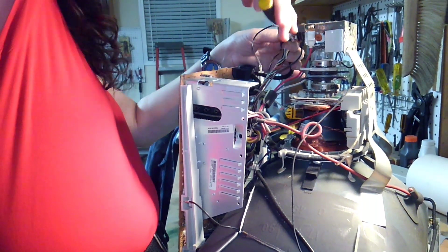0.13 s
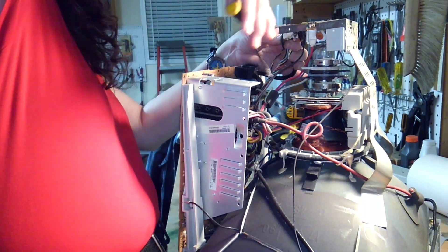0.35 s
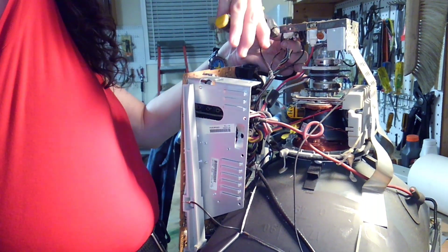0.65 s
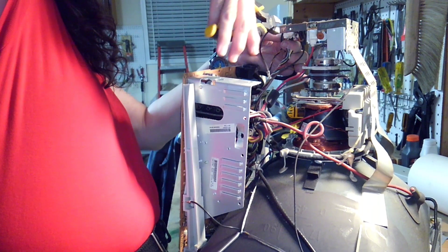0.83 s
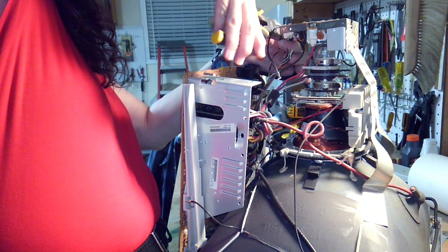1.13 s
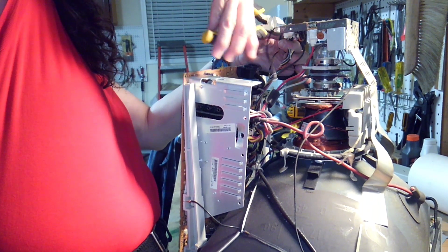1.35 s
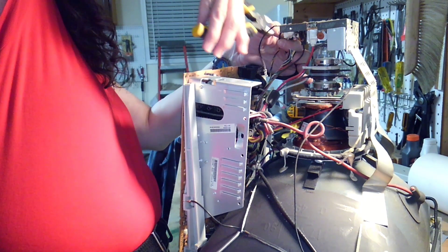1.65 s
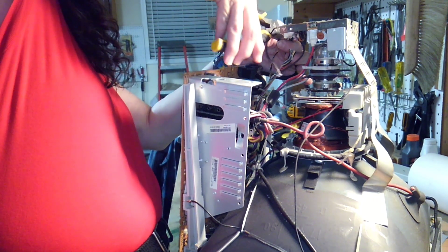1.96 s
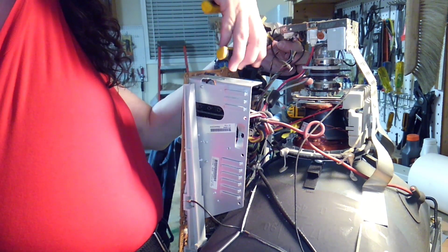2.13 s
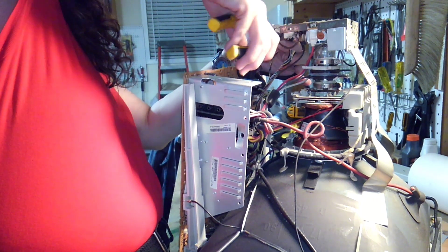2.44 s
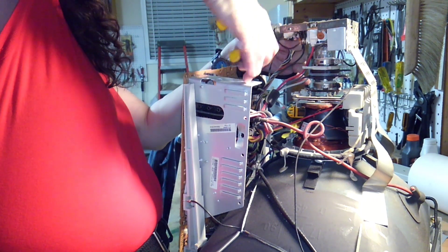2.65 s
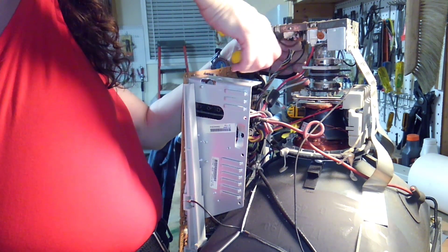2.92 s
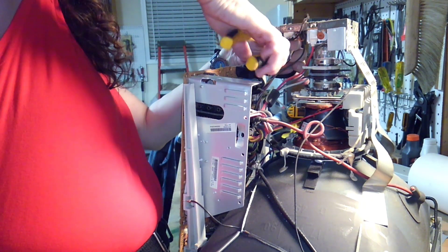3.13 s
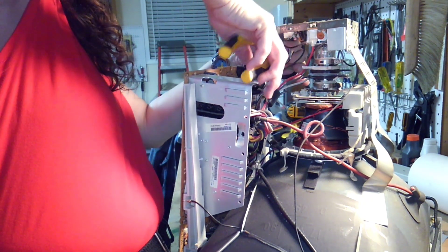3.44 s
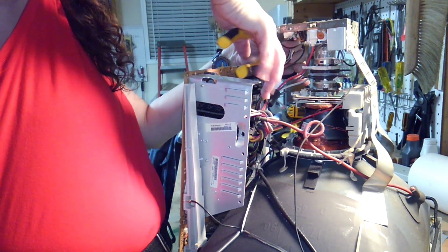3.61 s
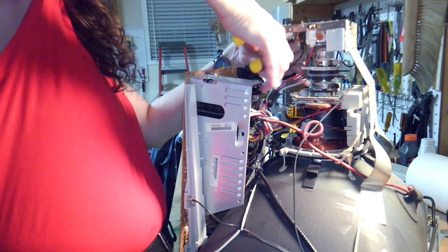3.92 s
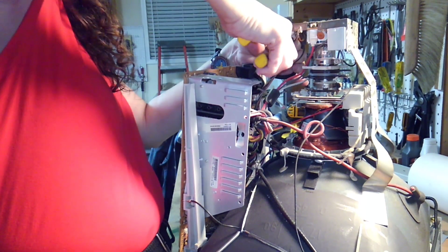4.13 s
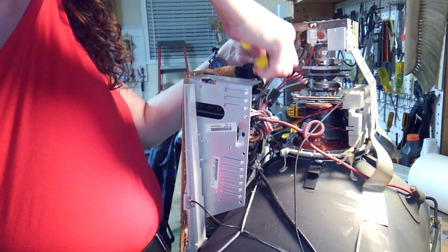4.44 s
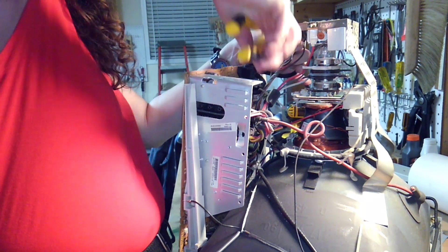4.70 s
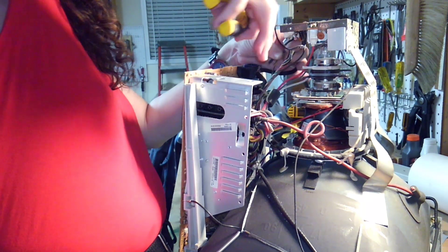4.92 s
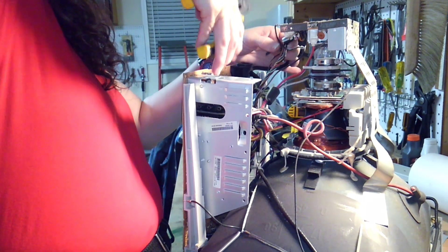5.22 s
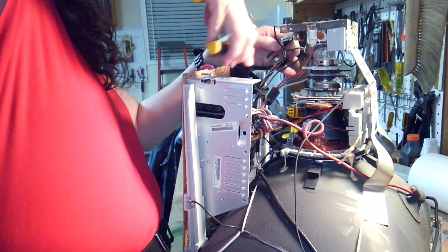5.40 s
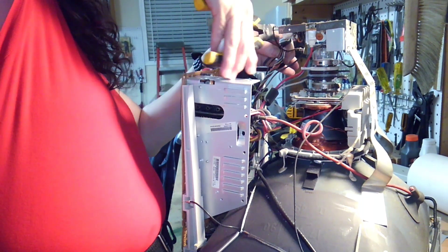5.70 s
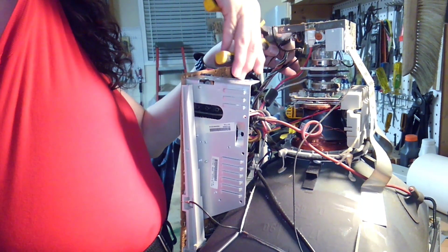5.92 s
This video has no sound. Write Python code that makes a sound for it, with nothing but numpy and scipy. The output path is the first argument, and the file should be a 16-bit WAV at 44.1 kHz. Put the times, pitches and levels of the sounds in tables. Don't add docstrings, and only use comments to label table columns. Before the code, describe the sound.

Sparse small clicks of hand cutters on thin metal and plastic, two hard crackling snips, faint scrapes and bench thumps in a workshop.

```python
import sys
import numpy as np
from scipy import signal
from scipy.fft import rfft, irfft
from scipy.io import wavfile

SR = 44100
rng = np.random.default_rng(int(sys.argv[2]) if len(sys.argv) > 2 else 0)


def persist_wave(psi):
    counts = np.round(np.clip(psi, -1, 1) * 32767).astype(np.int16)
    wavfile.write(sys.argv[1], SR, np.atleast_2d(counts).T)


def volts(x):
    e = np.asarray(x, float) / 20
    return 10 ** e


N = 267246

# start in seconds, jaws peak in dB,
# then shield, casing and wire crack in dB relative to the jaws.
SNIPS = [(1.5384, -15, -3, -18.5, -6), (1.5408, -12.5, -4, -26, -10.5), (1.5439, -9, -27, -30, -7),
         (1.548, -17, -3, -22, -5), (1.5519, -20, -13, -24, -15), (1.5962, -22, -14, -30, -20),
         (4.3268, -3.5, -7, -15, -13), (4.3338, -18.5, -18, -30, -23), (4.3404, -17, -17, -25, -20),
         (4.372, -14, -14, -17.5, -21), (4.3986, -9.5, -6.5, -15, -8), (4.4037, -10.5, -14, -26, -18),
         (4.4103, -15, -16, -8, -23), (4.5398, -27, -13, -3, -24), (4.5597, -29, -14, -22, -27)]
# start in seconds, jaws peak in dB,
# shield and casing in dB relative to the jaws, rattle length in ms.
TICKS = [(0.0573, -33, -6, -13, 15), (0.333, -37, -12, -10, 12), (0.3685, -41, 3, -16, 12),
         (0.398, -31.5, -2, -26, 7.2), (0.406, -34.5, 0, -15, 5.2), (0.88, -48, -2, -14, 3.9),
         (0.9257, -29.5, 2, -11, 6.1), (2.615, -38, -14, -15, 2.8), (2.6412, -29, -21, -15, 3.6),
         (2.699, -35.5, -9, -14, 9.1), (2.722, -36, -19, -11, 7.2), (2.736, -40, -14, -16, 5.6),
         (3.1724, -39.5, -7, -2, 6.9), (3.6816, -43.5, -4, -3, 9.7), (3.7698, -32, -12, -17, 5.4),
         (3.7865, -40, -20, 3, 4.8), (5.8916, -37, -11, -30, 10.5), (5.9958, -33, -11, -15, 10),
         (6.0011, -32, -5.5, -16.5, 16)]
# start in seconds, jaws peak in dB.
TOUCHES = [(0.035, -44), (0.079, -42), (0.7, -52), (0.9382, -50), (1.527, -45), (1.9831, -50),
           (2.6526, -47), (2.7574, -55), (3.1294, -47), (3.5783, -51), (3.8104, -51), (3.8494, -50),
           (3.929, -54), (5.3627, -47), (5.692, -51), (5.8185, -47)]
# start, peak and end in seconds, jaws peak in dB,
# casing in dB relative to the jaws.
SCRAPES = [
    (0.332, 0.353, 0.4, -47, -11),
    (0.379, 0.4, 0.425, -42, -6),
    (2.69, 2.71, 2.77, -49, -2),
    (3.699, 3.764, 3.89, -49.5, -8),
    (4.334, 4.4, 4.52, -25, -12),
    (5.685, 5.71, 5.76, -59, -14),
]
# frequency in Hz, level in dB, T60 in seconds.
JAW_MODES = [(4970, -10, 0.014), (5370, -0.5, 0.0062), (5655, 5.5, 0.0053), (6075, 1.5, 0.0065),
             (6303, -5.5, 0.011), (6326, -3.5, 0.01), (6610, 3, 0.0045), (7154, -3, 0.012),
             (8030, 0, 0.0028)]
SHIELD_MODES = [(2830, 12, 0.0015), (3770, 2, 0.0075), (3730, -8, 0.021), (4230, 17, 0.0018),
                (4840, -15, 0.0025)]
CASING_MODES = [(870, -8, 0.012), (1250, -3, 0.0046), (1850, -1, 0.0078), (2150, 1, 0.0044),
                (2603, 3, 0.0064)]
CRACK_MODES = [(8860, 4, 0.0025), (9900, 8, 0.0013), (10500, -28, 0.00099), (10400, 10, 0.0011),
               (13800, 7, 0.0028), (14100, 9.5, 0.0012), (15700, -16, 0.0018)]
PARTS = (JAW_MODES, SHIELD_MODES, CASING_MODES, CRACK_MODES)
# start in seconds, peak in dB, pitch in Hz.
KNOCKS = [(0.924, -37, 1015), (1.54, -43, 1180), (2.64, -38.5, 716), (2.7, -42.5, 790), (2.718, -45.5, 437),
          (3.681, -44.5, 203), (3.763, -44.5, 730), (3.82, -45, 704), (4.326, -34, 380), (4.4, -33, 499),
          (4.427, -35, 224), (4.457, -40, 600), (4.54, -33.5, 1110), (4.568, -39, 427), (5.099, -39, 416),
          (5.926, -47, 665), (6.004, -46, 198)]
# start in seconds, peak in dB, frequency in Hz, T60 in seconds.
RINGS = [
    (.059, -43, 7060, .025),
    (.881, -49, 4870, 0.02),
    (.926, -44.5, 1720, 0.08),
    (2.641, -38, 5350, 0.063),
    (2.642, -52, 9100, 0.035),
    (2.700, -51, 8800, 0.14),
    (3.788, -48, 2310, 0.032),
    (6.004, -43, 2800, 0.02),
]
# start in seconds, peak in dB, frequency in Hz.
PINGS = [(0.059, -39, 5750), (.335, -38, 5750), (0.364, -44, 3870), (.402, -34.5, 4300), (.406, -36, 5800),
         (0.926, -28.5, 4140), (1.540, -23, 3580), (1.545, -12, 6700), (1.549, -23, 5600),
         (2.735, -38, 6600), (4.329, -14, 5000), (4.334, -12, 6130), (4.374, -13, 5150), (4.405, -13, 6120),
         (4.541, -36.5, 1900), (5.700, -48, 5500), (6.002, -34, 6220)]
# frequency in Hz, T60 in seconds, level in dB.
SHOP = [(250, 0.79, -21.5), (490, 0.6, -17), (1000, 0.65, -17.5), (2020, 0.63, -19.5), (4100, 0.84, -24.5),
        (6500, 0.7, -25), (10100, 0.52, -22), (15000, 0.53, -32)]
# frequency in Hz, width in Hz.
BENCH_MODES = [(66, 22.7), (124, 35.4)]
# start in seconds, low mode in dB, upper mode in dB.
JOLTS = [(0.03, -44.5, -61), (0.39, -51, -56), (1.6, -65, -49), (1.9, -52, -58), (2.66, -49, -45),
         (2.78, -50, -49.5), (3.27, -50, -50), (3.8, -59, -52), (4.06, -48.5, -64), (4.35, -40, -39.5),
         (4.45, -54, -36), (4.56, -45, -48), (4.68, -43, -51), (5.64, -58, -64), (6.02, -42, -43)]
# frequency in Hz, density in dB per Hz.
HISS = [(25, -55), (41, -14), (64, -2.5), (100, -6), (250, -10.5), (600, -15.5), (1590, -21.5),
        (15700, -29.5)]
# frequency in Hz, width in Hz, level in dB.
CAPSULE = (6650, 1000, -72.5)


def contacts(table, trim_db, rise, blow):
    out = np.zeros(N + SR)
    energy = np.zeros((len(PARTS), N))
    t = np.arange(SR // 8) / SR
    for start, db, *share_db, ms in table:
        draw = rng.random((2, len(t)))
        spots = rng.standard_normal((4, 9, 2))
        length = max(ms, 0.3) / 1000
        chatter = np.where(draw[0] < 0.12, draw[1] - 0.5, 0)
        envelope = np.exp(-t / length) * (1 - np.exp(-t / (rise * length)))
        force = chatter * envelope + blow * (t == 0)
        i = int(start * SR)
        for k, (modes, rel, trim, spot) in enumerate(zip(PARTS, [0, *share_db], trim_db, spots)):
            ring = volts(db + rel + trim) * body(force, modes, spot)
            out[i:i + len(t)] += ring
            energy[k, i] += np.sum(ring ** 2)
    return out[:N], energy


def scrapes(density, trim_db):
    start_db, end_db = -11.5, -15
    shield_db, crack_db = -11.5, -11.5
    out = np.zeros(N)
    for start, top, end, db, casing_db in SCRAPES:
        t = np.arange(start, end, 1 / SR)
        draw = rng.random((2, SR // 4))[:, :len(t)]
        spots = rng.standard_normal((4, 9, 2))
        slips = np.where(draw[0] < density, draw[1] - 0.5, 0)
        fade = np.minimum(1, np.minimum(t - start, end - t) / 0.0037)
        press = fade * volts(db + np.interp(t, (start, top, end), (start_db, 0, end_db)))
        i = int(start * SR)
        shares = (0, shield_db, casing_db, crack_db)
        for modes, rel, trim, spot in zip(PARTS, shares, trim_db, spots):
            ring = body(slips, modes, spot, spread_db=1.5)
            out[i:i + len(t)] += press * volts(rel + trim) * ring / ring.std()
    return out


def body(force, modes, spot, spread_db=4.0, detune=0.019):
    rings = []
    for (hz, db, t60), (level_draw, pitch_draw) in zip(modes, spot):
        mode = resonate(force, hz * (1 + detune * pitch_draw), t60)
        rings.append(volts(db + spread_db * level_draw) * mode)
    ring = sum(rings[::2]) - sum(rings[1::2])
    ring = band(ring, 0.8 * modes[0][0], 1.15 * modes[-1][0])
    return ring / np.abs(ring).max()


def strikes(table, partials, contact_cycles):
    out = np.zeros(N + SR)
    for start, db, hz, t60 in table:
        push = np.zeros(SR // 2)
        width = int(contact_cycles * SR / hz) + 3
        push[:width] = np.hanning(width)
        ring = sum(volts(part_db) * resonate(push, hz * ratio, t60) for ratio, part_db in partials)
        ring = band(ring, hz / np.sqrt(2), hz * np.sqrt(2))
        i = int(start * SR)
        out[i:i + len(ring)] += volts(db) * ring / np.abs(ring).max()
    return out[:N]


def shop(x, noise):
    near_s, near_db = 0.016, 5.5
    t = np.arange(SR) / SR
    octaves = np.log2(np.arange(SR // 2 + 1) + 1.0)
    hz, t60, db = np.transpose(SHOP)
    spectrum, tail = rfft(noise), 0
    for centre in np.arange(7.5, 14.3, 1 / 3):
        share = np.maximum(0, 1 - 3 * np.abs(octaves - centre))
        level = np.interp(centre, np.log2(hz), db)
        fall = level - 60 * t / np.interp(centre, np.log2(hz), t60)
        tail = tail + volts(fall) * irfft(spectrum * share, SR)
    near = near_db / (1 + np.exp((t - near_s) / 0.0022))
    tail *= (1 - np.exp(-t / 0.0023)) * volts(near - 13.0)
    return signal.fftconvolve(x, tail)[:N]


def colour(modes, skirt=5.7):
    f = np.arange(SR // 2 + 1) + 1.0
    power = 0
    for hz, db, t60 in modes:
        half_width = np.log(1000) / (2 * np.pi * t60)
        power = power + volts(2 * db) / ((f - hz) ** 2 + half_width ** 2)
    power /= 1 + (1.02 * modes[0][0] / f) ** (2 * skirt)
    power /= 1 + (f / (1.35 * modes[-1][0])) ** (2 * skirt)
    noise = irfft(rfft(rng.standard_normal(SR)) * np.sqrt(power), SR)
    return noise / noise.std()


def bench():
    rise_s, fall_s, rests_db = 0.021, 0.08, (-59, -63.5)
    start, *levels = np.transpose(JOLTS)
    since = np.arange(N)[::64] / SR - start[:, None]
    swell = np.exp(-np.where(since < 0, -since / rise_s, since / fall_s))
    out = 0
    for (hz, width), db, rest_db in zip(BENCH_MODES, levels, rests_db):
        t60 = np.log(1000) / (np.pi * width)
        boom = resonate(resonate(rng.standard_normal(N), hz, t60), hz, t60 / 2)
        force = np.sqrt(volts(rest_db) ** 2 + volts(db) ** 2 @ swell ** 2)
        out = out + boom / boom.std() * np.repeat(force, 64)[:N]
    return out


def hiss():
    level_db = -54.5
    hz, db = np.transpose(HISS)
    f = np.arange(N // 2 + 1) * SR / N + 1
    shape = volts(np.interp(np.log(f), np.log(hz), db))
    air = irfft(rfft(rng.standard_normal(N)) * shape, N)
    above = np.sqrt(np.sum(shape[f > 200] ** 2) / np.sum(shape ** 2))
    centre, width, capsule_db = CAPSULE
    sing = band(rng.standard_normal(N), centre - width / 2, centre + width / 2)
    return air * volts(level_db) / (air.std() * above) + sing * volts(capsule_db) / sing.std()


def resonate(x, hz, t60):
    pole = np.exp(2j * np.pi * hz / SR - np.log(1000) / (t60 * SR))
    return signal.lfilter([1], [1, -pole], x).imag


def band(x, lo_hz, hi_hz):
    sos = signal.butter(2, [lo_hz, min(hi_hz, 0.49 * SR)], "bandpass", fs=SR, output="sos")
    return signal.sosfilt(sos, x)


def scene():
    snip_rows = [(*row, 3.3) for row in SNIPS]
    snips, snip_energy = contacts(snip_rows, trim_db=(-4.0, -4.0, -3.0, 0.0), rise=0.012, blow=0.61)

    light = [(start, db, -14, -8, 6.8) for start, db in TOUCHES]
    taps = [(*row[:4], -16, row[4]) for row in TICKS + light]
    ticks, tick_energy = contacts(taps, trim_db=(-1.0, -4.0, -4.0, 3.5), rise=0.11, blow=0.37)

    scrape = scrapes(density=0.044, trim_db=(-3.5, -3.0, -6.5, -4.0))
    dull = [(start, db, hz, 0.023 * (400 / hz) ** 0.36) for start, db, hz in KNOCKS]
    knocks = strikes(dull, [(0.994, 0.0), (0.573, 4.5), (1.48, -0.5)], contact_cycles=0.42)
    pings = [(*row, 0.012) for row in PINGS]
    rings = strikes(RINGS + pings, [(1, 0)], contact_cycles=0.3)

    echoes = shop(scrape + knocks + rings, rng.standard_normal(SR))
    for energy, modes in zip(tick_energy + snip_energy, PARTS):
        echoes += shop(np.sqrt(energy), colour(modes))
    return (ticks + snips + scrape + knocks + rings + echoes + bench() + hiss())[None]


def band_limit(x):
    return signal.sosfilt(signal.butter(12, 16640, fs=SR, output="sos"), x)


def record(dry):
    bass_cut = signal.butter(3, 36.4, "highpass", fs=SR, output="sos")
    top_cut = signal.ellip(10, 0.2, 60, 15900, fs=SR, output="sos")
    mix = signal.sosfilt(top_cut, signal.sosfilt(bass_cut, dry))
    return band_limit(mix)


dry = scene()
out = record(dry)
persist_wave(out)
```